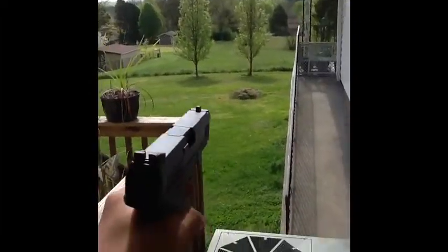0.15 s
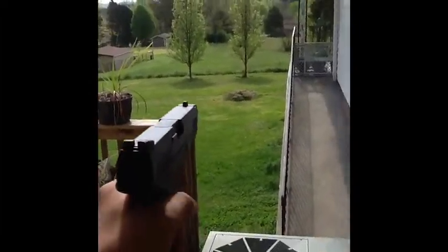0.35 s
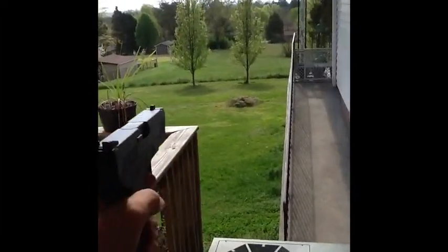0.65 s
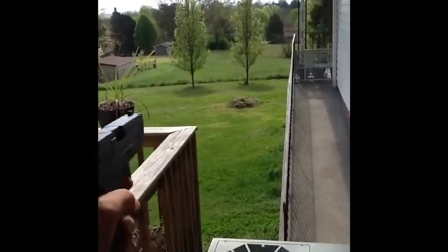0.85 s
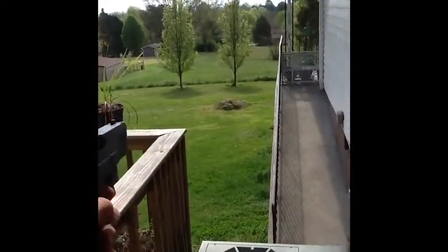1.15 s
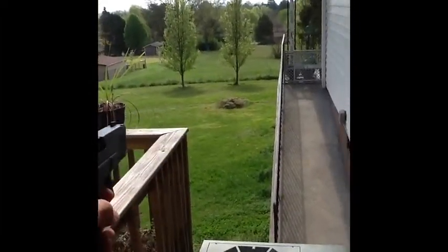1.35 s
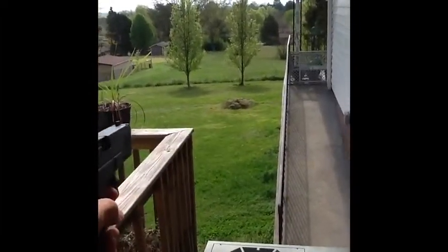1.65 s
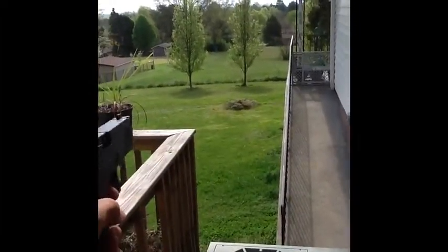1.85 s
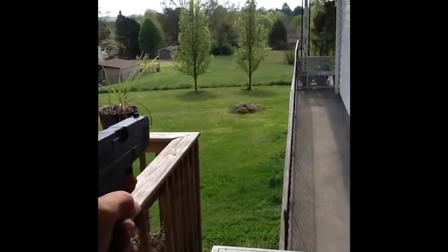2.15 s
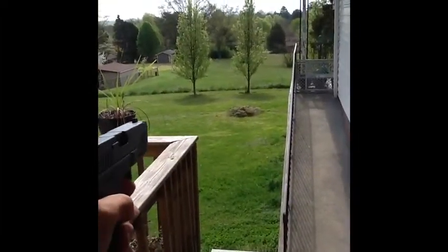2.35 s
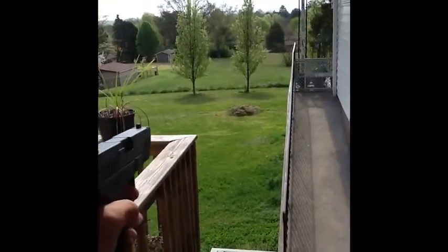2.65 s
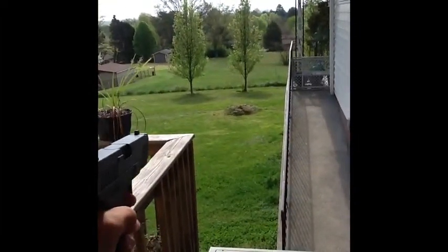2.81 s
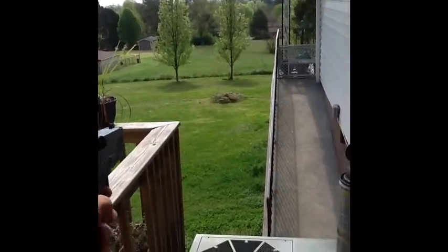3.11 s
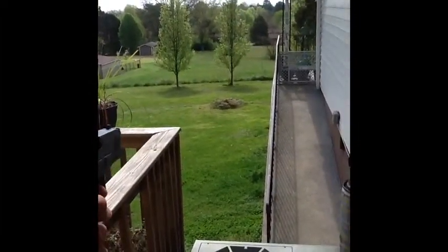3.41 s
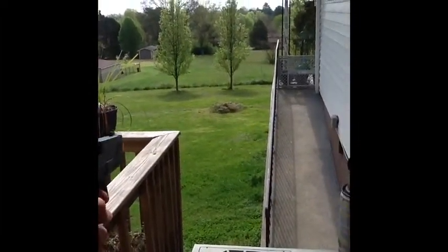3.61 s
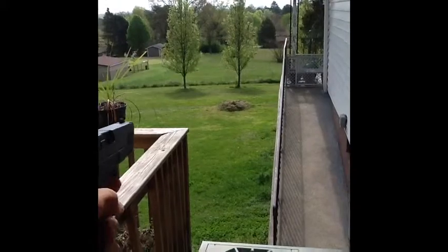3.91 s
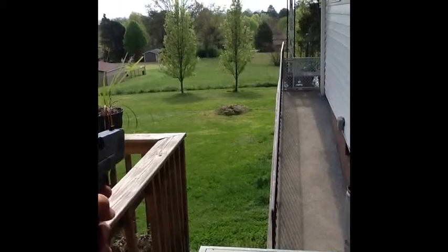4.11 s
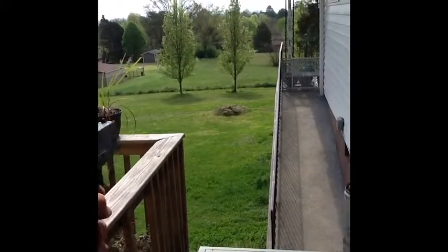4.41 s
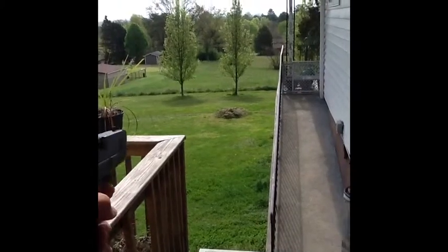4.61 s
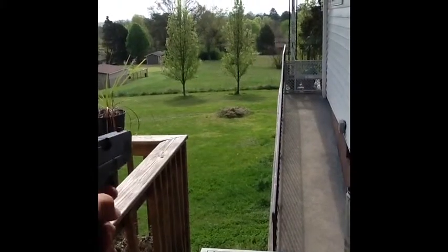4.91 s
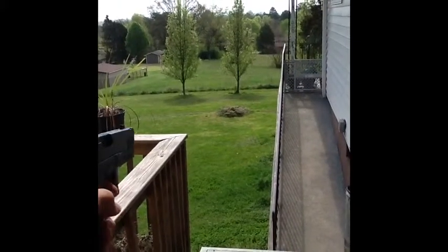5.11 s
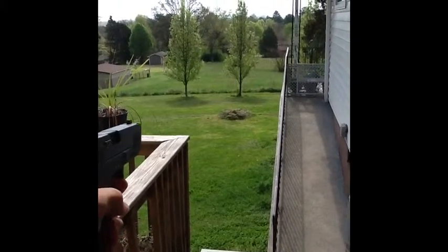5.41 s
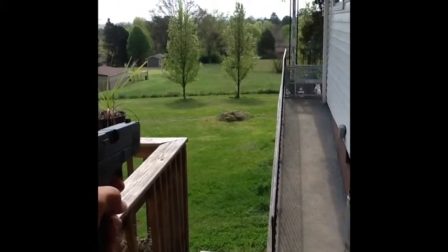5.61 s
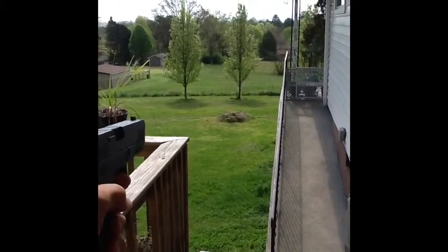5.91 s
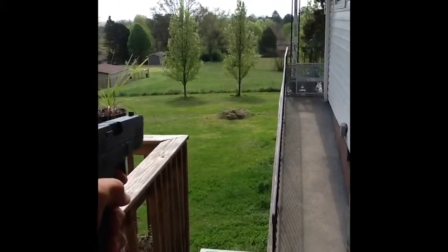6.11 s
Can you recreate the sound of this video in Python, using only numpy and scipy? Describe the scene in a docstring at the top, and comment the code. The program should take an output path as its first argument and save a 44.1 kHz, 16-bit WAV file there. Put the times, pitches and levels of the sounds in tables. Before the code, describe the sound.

A faint hush of distant traffic and air in trees fills a backyard, with far birds chirping and whistling on and off. In the first 0.6 seconds a hand knocks softly on the microphone several times. At about 1.9 seconds a gas airsoft pistol fires at arm's length: a loud, sharp pop with a low thump and the quick clack of the slide. Five more shots follow at about 3.6, 4.4, 5.1, 5.7 and 6.2 seconds, closer together and gradually a little duller. A light trigger click follows each shot, with other small clicks near 2.4, 4.9, 5.6 and 6.1 seconds. Each shot rings briefly off the wooden deck and house wall, with a very faint echo from the trees. The background dips after every shot and slowly recovers. One brighter bird peep stands out near 4.2 seconds.

```python
"""A distant hush, soft knocks of a hand on the camera and birdsong over a back lawn; then a gas blowback
airsoft pistol fires six shots from a wooden deck, an arm's length away. In each shot the hammer knocks
the valve, gas pops from the muzzle, the slide hits its rear stop and slams shut; the trigger clicks.
Deck and house wall ring briefly and far trees answer faintly. The shots drive an automatic gain control,
so the birds and the hush duck and slowly recover."""
import sys
import numpy as np
from scipy import signal
from scipy.fft import rfft, irfft
from scipy.io import wavfile

SR = 44100
rng = np.random.default_rng(int(sys.argv[2]) if len(sys.argv) > 2 else 0)


def store_wav(level_fs):
    """Save 16-bit WAV to argv[1]."""
    pcm = np.round(np.clip(np.atleast_2d(level_fs), -1, 1) * 32767)
    wavfile.write(sys.argv[1], SR, pcm.T.astype(np.int16))


N = 275968
AGE = np.arange(SR // 2) / SR  # time after a blow, t/s

# shots: (t/s, hammer level/dB, bass level/dB, slide return delay t/s, trigger reset delay t/s)
SHOT_EVENTS = [(1.866, 3, 3.5, 0.039, 0.12), (3.5863, 0, 2.5, 0.048, 0.14), (4.4259, -2, -2.5, 0.051, 0.16),
               (5.0876, -2.5, 3.5, 0.054, 0.16), (5.7259, 0.5, -2, .0538, .156),
               (6.1985, -1, -8, .052, .16)]
# normal modes of slide and frame: (f/Hz, level/dB, t60/s)
FRAME_MODES = [(1153, -4.5, 0.04), (1520, -4, 0.028), (1695, -4, .04), (1990, -7, 0.066), (2186, -6, 0.081),
               (3530, -6, 0.016), (3870, -1.5, .04), (4129, 0, .04), (4640, -9.5, 0.022),
               (4840, -0.5, 0.024), (5340, -2, 0.016), (6700, 2, 0.032), (7100, -4.5, 0.035),
               (8340, -9.5, 0.02)]


def undb(db):
    """Amplitude ratio of a level in decibels."""
    return 10 ** (np.asarray(db) / 20)


def unit(x):
    """Normalisation to unit energy."""
    return x / np.sqrt(np.sum(x ** 2))


def curve_at(points, hz):
    """Interpolation of (f/Hz, value) points on a logarithmic frequency axis."""
    f, value = np.transpose(points)
    return np.interp(np.log(np.maximum(hz, 1)), np.log(f), value)


def decay(t60):
    """Exponential damping, 60 dB down after t60 seconds."""
    return np.exp(-np.log(1000) * AGE / t60)


def colour(x, spectrum):
    """Minimum-phase filtering by a spectrum of (f/Hz, level/dB) points."""
    n = 2 * len(x)
    hz = np.arange(n // 2 + 1) * SR / n
    cepstrum = irfft(np.log(undb(curve_at(spectrum, hz))))
    cepstrum[1:n // 2] *= 2  # folding onto positive time makes the filter causal
    cepstrum[n // 2 + 1:] = 0
    return irfft(rfft(x, n) * np.exp(rfft(cepstrum)))[:len(x)]


def add(track, s, x):
    """Superposition of x on the track, starting at s seconds."""
    i = max(int(s * SR), 0)
    track[i:i + len(x)] += x[:max(len(track) - i, 0)]


def whiten(x):
    """Partial whitening: spectral magnitudes are evened out and phases kept."""
    spectrum = rfft(x)
    magnitude = np.abs(spectrum)
    return irfft(spectrum / (magnitude + 0.29 * magnitude.mean()), len(x))


def burst(t60):
    """Exponentially damped noise of unit energy."""
    noise = whiten(rng.standard_normal(len(AGE)) * decay(1.5 * t60))
    return unit(noise * decay(3 * t60))  # the two decay rates sum to 1 / t60


def hush(level_db=-55):
    """Far traffic and air in the trees: broadband noise under slight, slow amplitude modulation."""
    # spectrum of the background: (f/Hz, level/dB)
    hush_spectrum = [(18, -62.5), (30, -30.5), (59, -15), (143, -2.5), (288, -2), (485, -6.5), (1170, -11),
                     (1650, -16.5), (2310, -17), (2770, -22.5), (3230, -23), (4090, -24), (7430, -25.5),
                     (15000, -28)]
    air = colour(rng.standard_normal(N), hush_spectrum)
    waver_db = .4 * np.interp(np.arange(N), np.linspace(0, N, 50), rng.standard_normal(50))
    return air / air.std() * undb(level_db + waver_db)


def hand_bumps():
    """Structure-borne sound: a hand on the camera excites a damped low resonance and friction noise."""
    # knocks while taking aim: (t/s, peak level/dB, f/Hz)
    knocks = [(.088, -41.5, 206), (.122, -39.5, 300), (.266, -34.5, 293), (.419, -41, 320),
              (.589, -42, 166)]
    out = np.zeros(N)
    for s, db, hz in knocks:
        thud = np.sin(2 * np.pi * hz * AGE) * AGE * decay(0.025)
        rub = colour(burst(0.17), [(60, -15), (hz, 0), (650, -8), (1500, -28), (6000, -45)])
        knock = unit(thud) + 0.74 * unit(rub)
        add(out, s, undb(db) * knock / np.abs(knock).max())
    return out


def birds(waver=.005, rasp=0.22, echo_db=-1, settle=1.8, scatter_db=1):
    """Distant birds repeat frequency-modulated whistles, which scattering in the trees smears."""
    # each bird's gliding note: (length t/s, start f/Hz, end f/Hz, repeat period t/s)
    notes = {"pipe": (.045, 4800, 4810, .124), "chirp": (.042, 3440, 3220, .276),
             "whistle": (.115, 2250, 2385, .31), "slur": (.09, 2230, 1760, .338),
             "thin": (.085, 7400, 7350, .3), "chip": (.05, 8000, 7000, .3), "hoot": (.085, 1160, 1230, .3)}
    # bouts of song: (bird, start t/s, end t/s, level/dB)
    songs = [("chip", .19, .25, -64), ("chirp", .435, 1.86, -65), ("pipe", .57, 1.25, -68.5),
             ("thin", .78, .87, -70), ("hoot", .78, .87, -60), ("whistle", .89, 1.63, -62.5),
             ("chip", 1.41, 1.46, -61), ("slur", 2.578, 3.36, -59), ("whistle", 3.11, 3.21, -62.5),
             ("pipe", 3.53, 3.58, -60.5), ("pipe", 3.915, 3.96, -58.5), ("pipe", 4.21, 4.26, -48),
             ("chip", 4.32, 4.38, -57.5), ("whistle", 4.2, 4.89, -64), ("thin", 4.6, 5.03, -69.5)]
    out = np.zeros(N)
    for bird, first_s, last_s, song_db in songs:
        length_s, start_hz, end_hz, period_s = notes[bird]
        progress = np.linspace(0, 1, int(length_s * SR))
        glide_hz = end_hz + (start_hz - end_hz) * (1 - progress) ** settle
        depth = waver + rasp * abs(start_hz - end_hz) / end_hz  # wide glides rasp, level notes stay pure
        for s in np.arange(first_s, last_s, period_s):
            tremble = np.interp(progress, np.linspace(0, 1, 50), rng.standard_normal(50))
            hz = glide_hz * (1 + depth * tremble)
            note = np.sin(np.pi * progress) * np.sin(2 * np.pi * np.cumsum(hz) / SR)
            echo = unit(signal.fftconvolve(note, burst(0.41))) * np.linalg.norm(note)
            db = song_db + scatter_db * rng.standard_normal()
            add(out, s, undb(db) * note)
            add(out, s, undb(db + echo_db) * echo)
    return out


def ring(modes, scatter_db=2, detune=0.0068):
    """Free vibration of struck modes; each blow lands differently and shares out its energy anew."""
    chance = rng.standard_normal((len(modes), 3))
    out = 0
    for (hz, db, t60), (strength, shift, polarity) in zip(modes, chance):
        amplitude = np.sign(polarity) * undb(db + scatter_db * strength)
        out = out + amplitude * np.sin(2 * np.pi * hz * (1 + detune * shift) * AGE) * decay(t60)
    return unit(out)


def clack(t60, ring_db):
    """Impact of hard parts: a broadband crack and the modal ringing of slide and frame."""
    # spectrum of the contact: (f/Hz, level/dB)
    crack_spectrum = [(60, -36.5), (300, -18), (900, -10), (1250, -4.5), (1700, 4), (2200, 2.5), (2800, -5),
                      (4200, -4.5), (6800, -1.5), (9400, -4.5), (11000, -12), (15000, -19.5)]
    crack = unit(colour(burst(t60), crack_spectrum))
    return crack + undb(ring_db) * ring(FRAME_MODES, scatter_db=1.5, detune=0.018)


def muzzle_pop(t60=0.0067, swirl_db=-4, ring_db=-9):
    """Sudden expansion: gas leaves the barrel as a pressure pulse trailing turbulence; the frame rings."""
    # spectrum of the escaping gas: (f/Hz, level/dB)
    pop_spectrum = [(40, -29.5), (130, -13.5), (280, -4), (480, -7.5), (850, -5), (1130, 4.5), (2150, -1.5),
                    (2850, -5), (4000, 6.5), (5700, -7.5), (6900, -0.5), (9000, -9), (15000, -20)]
    pulse = undb(swirl_db) * burst(t60)
    pulse[0] += 1
    return unit(colour(pulse, pop_spectrum)) + undb(ring_db) * ring(FRAME_MODES)


def boom(modes):
    """Interference: neighbouring low modes start in antiphase, so their sum takes a few ms to build."""
    return unit(sum((-1) ** k * undb(db) * np.sin(2 * np.pi * hz * AGE) * decay(t60)
                    for k, (hz, db, t60) in enumerate(modes)))


def breech_thump(peak_s=.009, width_s=0.0072, swell_db=-4):
    """Turbulent gas swells out of the breech as the slide runs back; recoil excites the grip's modes."""
    # spectrum of the venting gas: (f/Hz, level/dB)
    vent_spectrum = [(30, -20.5), (80, -17), (150, -6.5), (250, -4.5), (380, -3), (560, -2.5), (900, -9),
                     (2000, -17), (8000, -45)]
    # low resonances of grip and hand: (f/Hz, level/dB, t60/s)
    grip_modes = [(149.5, -10, 0.058), (236.9, -1, 0.088), (283, 1.5, .045), (447, -1.5, 0.022),
                  (570, 2, 0.04), (686, 0, 0.032)]
    window = np.exp(-((AGE - peak_s) / width_s) ** 2)
    turbulence = whiten(rng.standard_normal(len(AGE)) * window) * window
    return undb(swell_db) * unit(colour(turbulence, vent_spectrum)) + boom(grip_modes)


def rail_chatter(t60=0.13, rough_db=4):
    """Sliding friction: slide and spring rattle along the rails as grainy, decaying noise."""
    # spectrum of the rattle: (f/Hz, level/dB)
    rail_spectrum = [(60, -33), (300, -9), (700, -0.5), (950, -6.5), (1400, -2.5), (2200, 3.5),
                     (2800, -2.5), (4200, -1), (5800, -7), (7000, -4), (9400, -8), (15000, -21)]
    grain = undb(rough_db * rng.standard_normal(len(AGE) // 50).repeat(50))
    return unit(colour(burst(t60) * grain, rail_spectrum))


def pistol(pop_db=25.5, lock_db=22.5, stop_db=21.0, shut_db=18.5, thump_db=17.5, chatter_db=20):
    """Blowback: gas pressure drives the slide back and a spring returns it, on cooler gas each shot."""
    # the sear slips, the hammer lands, the valve opens: (lead before the pop t/s, level/dB)
    lock_blows = [(.0052, -27.5), (.0034, -4.5), (.0013, -4.5)]
    # shapes of a shot's bass and treble emphasis: (f/Hz, share of the emphasis in dB)
    bass_shape = [(70, 0.9), (150, 0.7), (300, 0.042)]
    bite_shape = [(600, 0), (1000, 0.77), (3000, 0), (4400, 0.82), (5200, 0.88), (6500, 0.015)]
    pop_s, seat_s, seat_db = .008, .004, -3  # pop's place in the cycle; barrel's lag and relative level
    out = np.zeros(N)
    for fired, (s, hammer_db, bass_db, shut_s, _) in enumerate(SHOT_EVENTS):
        # as the gas cools, the pop stands out, the slide runs back later and softer, the sound dulls
        pop_gain = undb(pop_db + .5 * fired)
        thump_gain = undb(thump_db - .97 * fired)
        stop_gain = undb(stop_db - 1.1 * fired)
        stop_s = .0063 + .00042 * fired
        bite_db = 3.5 - 1.5 * fired
        cycle = np.zeros(len(AGE))
        for lead_s, blow_db in lock_blows:
            blow = clack(0.0042, ring_db=-5.5) * (1 - decay(0.0042))
            add(cycle, pop_s - lead_s, undb(lock_db + blow_db + hammer_db) * blow)
        add(cycle, pop_s, pop_gain * muzzle_pop())
        add(cycle, pop_s, thump_gain * breech_thump())
        add(cycle, pop_s, undb(chatter_db) * rail_chatter())
        rear_stop = clack(0.012, ring_db=-7.5) * (1 - decay(.003))
        slide_shuts = clack(0.022, ring_db=-6.5) * (1 - decay(0.0045))
        barrel_seats = clack(0.061, ring_db=-4.5) * (1 - decay(0.0077))
        add(cycle, pop_s + stop_s, stop_gain * rear_stop)
        add(cycle, pop_s + shut_s, undb(shut_db) * slide_shuts)
        add(cycle, pop_s + shut_s + seat_s, undb(shut_db + seat_db) * barrel_seats)
        tone = [(hz, bass_db * share) for hz, share in bass_shape]
        tone += [(hz, bite_db * share) for hz, share in bite_shape]
        add(out, s - pop_s, yard(colour(cycle, tone)))  # the aim shifts: each shot has its own echoes
    return out


def yard(x, near_db=-7.0, deck_db=-32, trees_db=-53, build_s=0.0093, trees_s=0.275):
    """Reverberation: railings and siding scatter the sound, the deck resonates, far foliage echoes."""
    # spectra of the near scattering and of the foliage echo: (f/Hz, level/dB)
    near_spectrum = [(60, -20.5), (230, -5.5), (500, -3.5), (950, -5.5), (1450, 0), (2300, -1), (3000, 1.5),
                     (4000, -4), (5300, 5), (6800, -1), (9000, 2), (15000, 1.5)]
    foliage_spectrum = [(500, -20.5), (1500, -4), (2200, 2.5), (3200, -1), (4300, -3.5), (5200, -1),
                        (7000, -8), (10000, -21.5)]
    # reverberation time near the house: (f/Hz, t60/s)
    decay_times = [(100, 0.2), (250, .28), (700, .23), (1700, 0.27), (5000, 0.28), (9000, .245),
                   (15000, 0.21)]
    # resonances of the deck: (f/Hz, level/dB, t60/s)
    deck_modes = [(230.3, -4.5, 0.23), (320, -2, .24)]
    hz = np.arange(len(AGE) // 2 + 1) * SR / len(AGE)
    scatter = rfft(whiten(rng.standard_normal(len(AGE))))
    near = 0
    for centre, t60 in decay_times:
        band = curve_at([(f, float(f == centre)) for f, _ in decay_times], hz)
        near = near + irfft(scatter * band) * decay(t60)
    near = unit(colour(near * (1 - np.exp(-AGE / build_s)), near_spectrum))
    trees = unit(colour(burst(1.0) * np.sqrt(AGE), foliage_spectrum))
    response = np.zeros(SR)
    response[0] = 1  # direct sound
    add(response, 0, undb(near_db) * near + undb(deck_db) * boom(deck_modes))
    add(response, trees_s, undb(trees_db) * trees)
    return signal.fftconvolve(x, response)


def trigger(level_db=14.5, crack_db=-4, reset_db=-18, reset_tilt_db=2):
    """Small impacts excite the trigger bar's modes: a reset after each shot, take-ups in between."""
    # modes of the trigger and its bar: (f/Hz, level/dB, t60/s)
    bar_modes = [(1390, -5, 0.014), (1900, 2, .025), (4440, -3.5, .02), (6500, 0.5, 0.024),
                 (7300, -1.5, 0.013), (9300, -10, .012)]
    # the finger takes up the slack: (t/s, level/dB, treble tilt/(dB per octave))
    take_ups = [(2.390, -29.5, 12), (4.902, -37.5, -2), (5.606, -41, -3), (6.145, -30.5, -2)]
    resets = [(s + reset_s, reset_db, reset_tilt_db) for s, _, _, _, reset_s in SHOT_EVENTS]
    out = np.zeros(N)
    for s, db, tilt_db in resets + take_ups:
        slope = [(1000, 0), (8000, 3 * tilt_db)]  # three octaves
        click = ring(bar_modes, detune=0.025) + undb(crack_db) * clack(0.0058, ring_db=-1)
        click = unit(colour(click * (1 - decay(0.0025)), slope))
        add(out, s, undb(level_db + db) * click)
    return out


def scene():
    """Superposition of the pistol in its yard, the hand's knocks and the outdoor background, in mono."""
    return (pistol() + yard(trigger())[:N] + hand_bumps() + birds() + hush())[None]


def gain_control(x, threshold_db=-19, depth_db=11.5, release_db_per_s=7.0, attack_s=0.0005):
    """Dynamic compression: loud peaks pull the gain down at once, and it creeps back slowly."""
    over_db = np.clip(20 * np.log10(np.abs(x) + 1e-9) - threshold_db, 0, depth_db)
    creep_db = release_db_per_s * np.arange(N) / SR
    held_db = np.maximum.accumulate(over_db + creep_db, axis=-1) - creep_db
    pole = np.exp(-1 / (attack_s * SR))
    return x * undb(-signal.lfilter([1 - pole], [1, -pole], held_db))


def record(dry, low_hz=61, top_hz=15400, ceiling=.84):
    """Compression, clipping of the sharpest peaks and band limiting by a bass cut and a steep top cut."""
    top_cut = signal.ellip(10, .1, 90, top_hz, fs=SR, output="sos")
    bass_cut = signal.butter(2, low_hz, "high", fs=SR, output="sos")
    compressed = gain_control(signal.sosfilt(top_cut, dry))
    clipped = np.clip(compressed, -ceiling, ceiling)
    return signal.sosfiltfilt(top_cut, signal.sosfilt(bass_cut, clipped))


dry = scene()
out = record(dry)
store_wav(out)
```